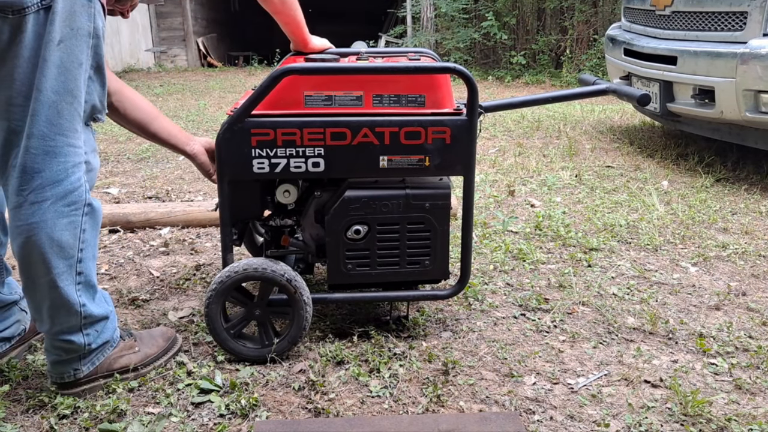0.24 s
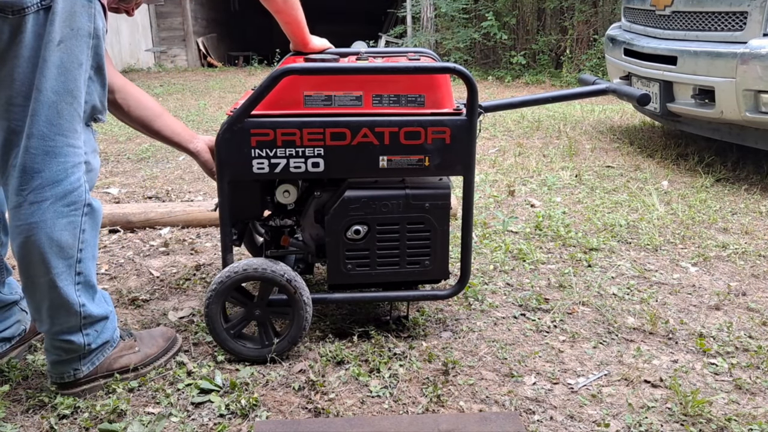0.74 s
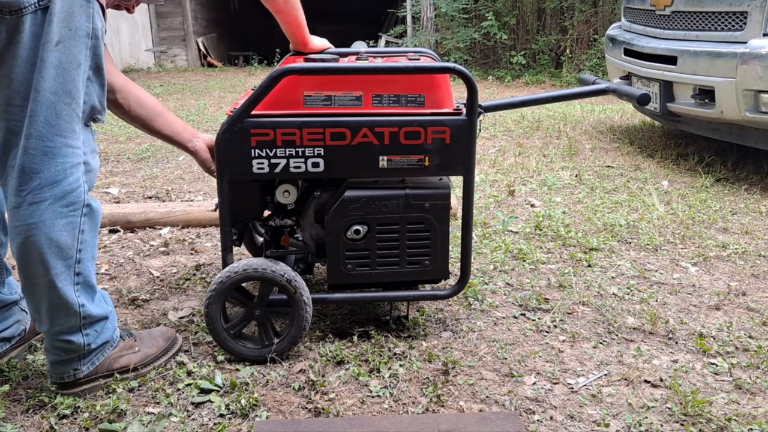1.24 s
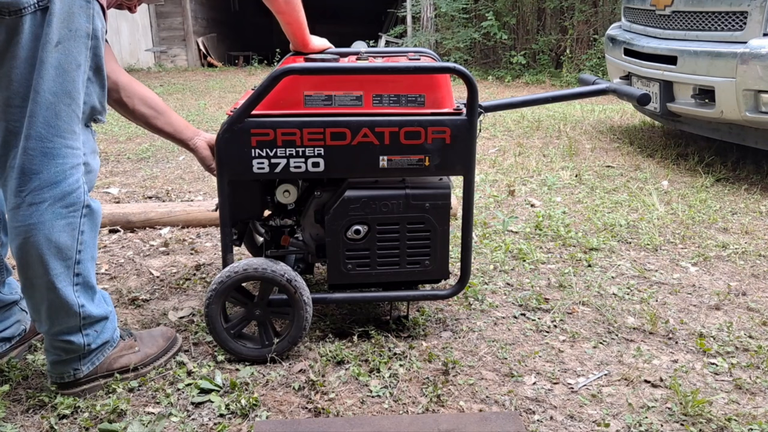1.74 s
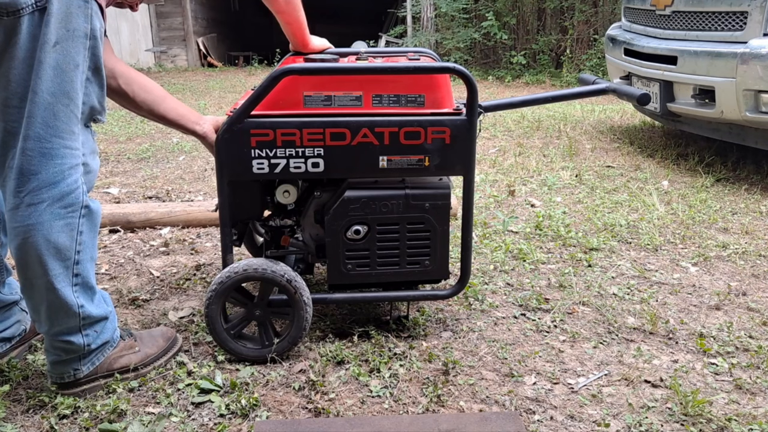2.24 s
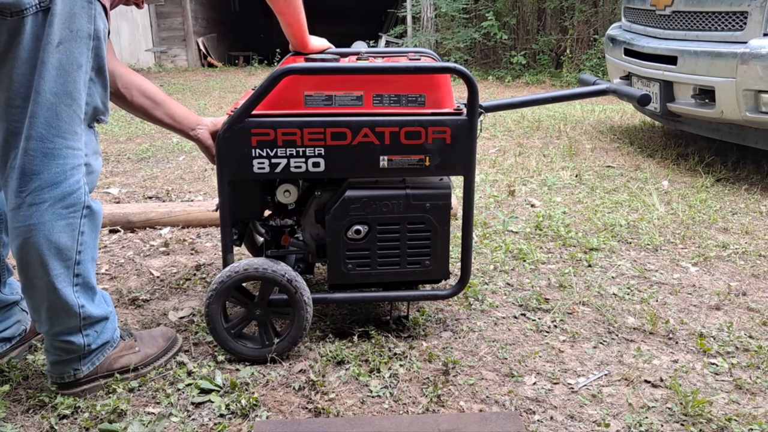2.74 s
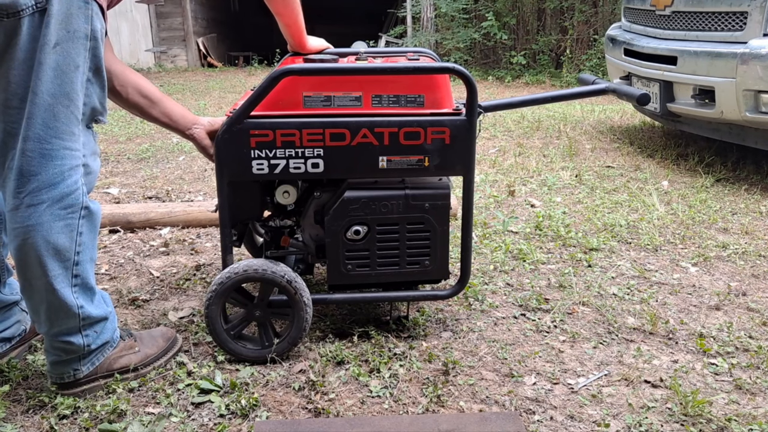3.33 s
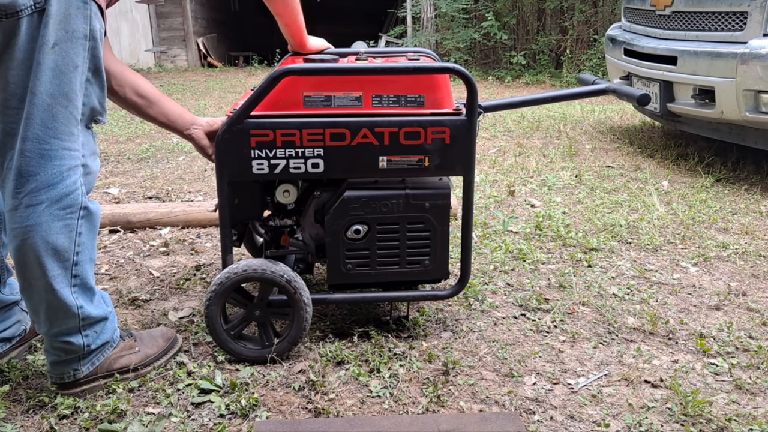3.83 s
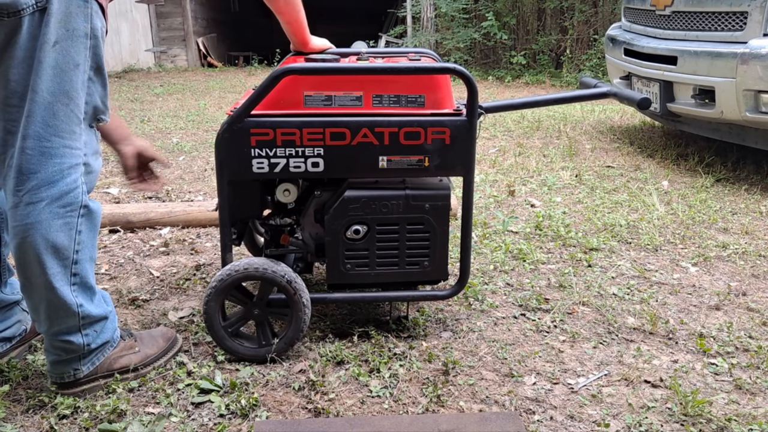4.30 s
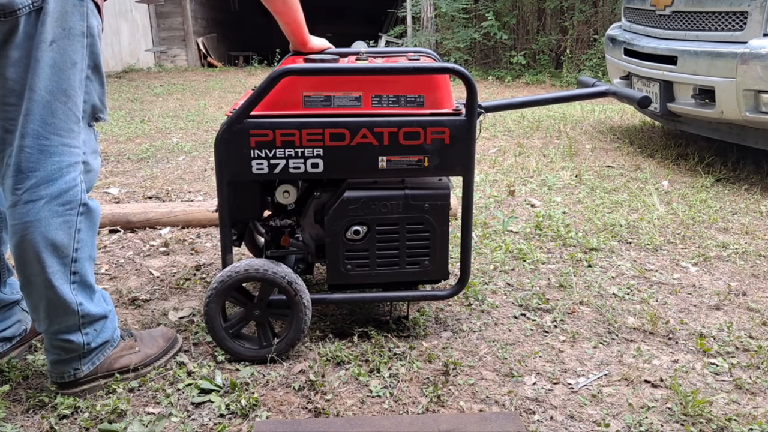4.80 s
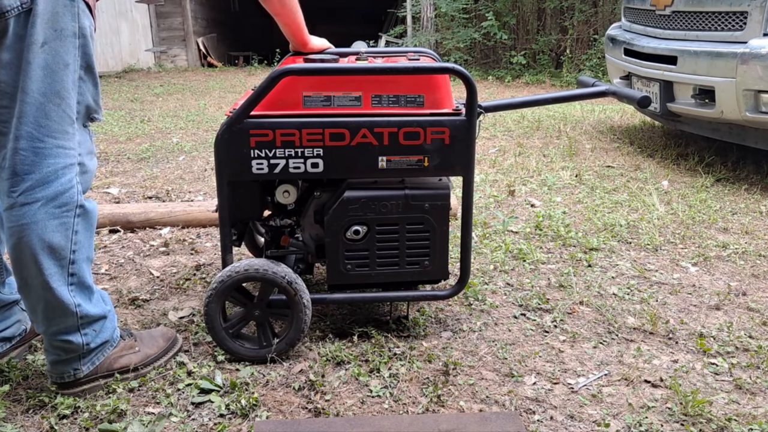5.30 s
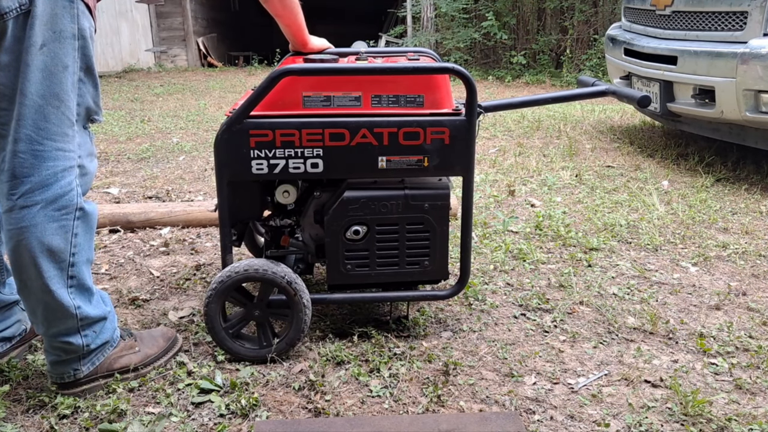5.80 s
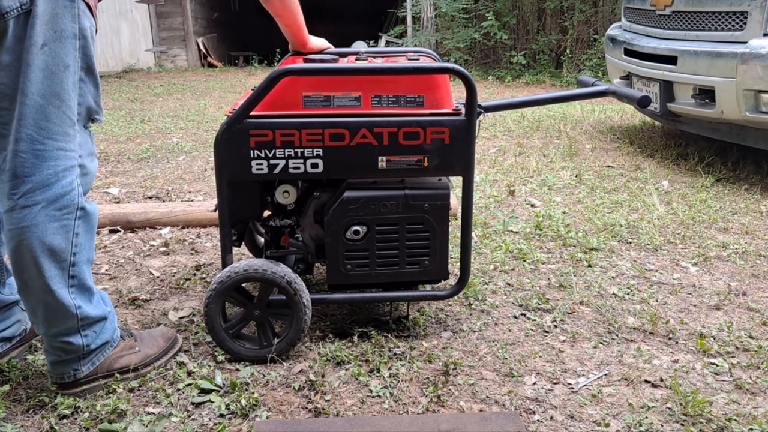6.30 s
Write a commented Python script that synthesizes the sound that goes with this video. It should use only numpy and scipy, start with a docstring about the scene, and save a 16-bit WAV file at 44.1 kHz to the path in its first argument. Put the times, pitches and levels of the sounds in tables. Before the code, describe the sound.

Quiet yard with wind and a throbbing cicada, then an electric starter grinds and a small generator engine fires up and runs unevenly.

```python
"""Wind, far hiss and a dying hum open on a yard; a hand knocks a panel, a cicada starts to throb.
The starter pinion slams in as bursts of casing noise; its gear tone climbs with rough grinding.
Dull puffs give way to the first firings of a small single-cylinder generator: pulses ring the muffler,
gas hisses, gears clatter, the frame shakes. Speed climbs past its later pace, thumps weaken and speed
sags, then louder chuffs return, the speed recovers and the thumps ease again."""
import sys
import numpy as np
from scipy import signal
from scipy.io import wavfile
from scipy.ndimage import uniform_filter1d

SR = 44100
rng = np.random.default_rng(int(sys.argv[2]) if len(sys.argv) > 2 else 0)


def to_wav(s):
    """Save 16-bit WAV."""
    ch = np.atleast_2d(s).T  # columns
    pcm = np.round(np.clip(ch, -1, 1) * 32767)  # PCM
    wavfile.write(sys.argv[1], SR, pcm.astype(np.int16))


N = 288855


def amp(db):
    """Gain of a level in dB."""
    return 10 ** (np.asarray(db) / 20)


def rms_one(x):
    """Scale to unit rms."""
    return x / np.sqrt(np.mean(x ** 2) + 1e-20)


def in_time(rows):
    """Columns of a time curve at every sample."""
    s, *columns = np.transpose(rows)
    return [np.interp(np.arange(N) / SR, s, c) for c in columns]


def between(rows):
    """Gate: 1 from the first row of a table to its last, else 0, with short ramps."""
    t = np.arange(N) / SR
    inside = 1. * (t >= rows[0][0]) * (t <= rows[-1][0])
    return uniform_filter1d(inside, size=64)


def at_hz(points, hz):
    """Read a spectrum on a log-frequency axis."""
    point_hz, value = np.transpose(points)
    return np.interp(np.log(hz), np.log(point_hz + 1e-9), value)


def drift(rate_hz):
    """Slow random curve of rms 1: two-pole filtered noise, one value per 40 samples."""
    r = np.exp(-80 * np.pi * rate_hz / SR)
    noise = rng.standard_normal(N // 40 + 2002)
    slow = signal.lfilter([1], [1, -2 * r, r * r], noise)[2000:]
    return np.interp(np.arange(N) / 40, np.arange(len(slow)), rms_one(slow))


def clicks(times_s, levels_db):
    """A train of single-sample blows."""
    out = np.full(N, 1e-18)
    at = np.round(np.asarray(times_s) * SR).astype(int)
    np.add.at(out, np.clip(at, 0, N - 1), amp(levels_db))
    return out


def fade(x, decay_s):
    """Each click becomes a sudden rise that dies away exponentially."""
    return signal.lfilter([1], [1, -np.exp(-1 / (decay_s * SR))], x)


def hold(x, lasts_s):
    """Each click becomes a smooth hump of the click's height, starting at the click."""
    return signal.fftconvolve(x, np.hanning(round(lasts_s * SR)))[:N]


def humps(times_s, heights, lasts_s):
    """Smooth humps centred on the given times."""
    out = np.zeros(N)
    out[(np.asarray(times_s) * SR).astype(int)] = heights
    return signal.fftconvolve(out, np.hanning(round(lasts_s * SR)), "same")


def ring(x, modes):
    """Each click sets every decaying mode (hz, db, t60_s) ringing."""
    out = 0
    for hz, db, t60_s in modes:
        r, w = amp(-60 / (t60_s * SR)), 2 * np.pi * hz / SR
        out = out + signal.lfilter([0, amp(db) * np.sin(w)], [1, -2 * r * np.cos(w), r * r], x)
    return out


def resonance(x, hz, width_hz):
    """Two-pole band-pass with a gain of about 1 at its peak."""
    r = np.exp(-np.pi * width_hz / SR)
    poles = [1, -2 * r * np.cos(2 * np.pi * hz / SR), r * r]
    return signal.lfilter(np.array([1, 0, -1]) * (1 - r * r) / 2, poles, x)


def bands(spectrum, like, pan, patchy_db):
    """Stereo noise in .4 octave bands, each with level, flicker, likeness and balance; mid rms 1."""
    low_hz, high_hz = spectrum[0][0], spectrum[-1][0]
    edges = np.geomspace(low_hz, high_hz, int(2.5 * np.log2(high_hz / low_hz)) + 1)
    white, out = rng.standard_normal((2, 2, N)), []
    for k, (low, high) in enumerate(zip(edges, edges[1:])):
        band_pass = signal.butter(2, [low, high], "band", fs=SR, output="sos")
        mid, side = signal.sosfilt(band_pass, white[k % 2])  # neighbours use independent noise
        hz = np.sqrt(low * high)
        alike = np.clip(at_hz(like, hz), -1, 1)
        pan_db = at_hz(pan, hz) / 2 * np.array([[1], [-1]])
        gain = amp(at_hz(spectrum, hz) + patchy_db * drift(10.4) + pan_db)
        out.append(gain * (np.sqrt(1 + alike) * mid + np.sqrt(1 - alike) * side * [[1], [-1]]))
    mid_rms = np.std(np.sum(out, axis=0).mean(axis=0))
    return np.sqrt(edges[1:] * edges[:-1]), np.array(out) / mid_rms


LEFT_BASS_CUT_HZ = 99


def right_heavy(x):
    """The left microphone port takes less bass."""
    bass_cut = signal.butter(1, LEFT_BASS_CUT_HZ, "high", fs=SR, output="sos")
    return np.array([signal.sosfilt(bass_cut, x) * amp(-2.8), x * amp(-1.1)])


# engine speed: start_s, firings_per_s
SPEED = [(4.13, 12.939), (4.2, 15.613), (4.27, 18.853), (4.35, 20.762), (4.45, 25.222), (4.55, 27.416),
         (4.7, 27.398), (4.9, 26.988), (5.1, 25.491), (5.3, 24.846), (5.5, 24.24), (5.7, 23.539),
         (5.85, 21.503), (6.0, 22.562), (6.2, 23.834), (6.4, 23.692), (6.55, 23.227)]
FIRST_FIRING_S = 4.134


def firing_times():
    """One firing each time the integral of engine speed passes a whole number."""
    cycles = np.cumsum(in_time(SPEED)[0]) / SR
    cycles = cycles - cycles[round((FIRST_FIRING_S + .003) * SR)]
    whole = np.arange(int(cycles[-1]) + 2)
    return np.interp(whole, cycles, np.arange(N) / SR, right=N / SR) - .003


def cycle(fired):
    """Running count of engine cycles."""
    return np.interp(np.arange(N) / SR, fired, np.arange(len(fired)))


# combustion, relative levels: start_s, thump_db, hiss_db
LOAD = [(4.13, -8.5, -25.5), (4.27, -5.5, -24), (4.37, -8, -30), (4.42, -7, -27), (4.53, -6.5, -30.5),
        (4.6, -13.5, -45), (4.8, -17.5, -49), (5.0, -19, -48), (5.6, -17, -45.5), (5.86, -16.5, -51),
        (5.918, -11, -28), (6.0, -11.5, -35), (6.15, -13, -40.5), (6.35, -16, -42.5), (6.55, -16, -43)]
# dull puffs while cranking, relative levels: start_s, thump_db, hiss_db
PUFFS = [(3.711, -29, -40), (3.767, -30, -55.5), (3.831, -28, -46), (3.884, -21, -60), (3.925, -27, -57),
         (3.966, -30, -49), (4.017, -20.5, -40), (4.043, -15.5, -37), (4.112, -13.5, -55)]
# side pulses of each stroke: start_s, gulp_re_thump_db, piston_push_lag_cycles
STROKES = [(4.13, -14, .3), (4.55, -10, .29), (4.65, -7, .24), (5.7, -7, .24), (5.9, -3, .24),
           (6.55, -5, .24)]
# muffler and pipe modes, relative levels: pitch_hz, level_db, t60_s
MUFFLER = [(66, -17, 0.19), (131, -5.5, 0.051), (218.3, -5.5, 0.02), (281.7, 4.5, 0.013), (345, -1, 0.0095)]
MUFFLER_TOP_HZ = 430
DULL_HZ = 184  # gulps and puffs excite little above this
GULP_LEAD_CYCLES, GULP_SPREAD_DB = .32, 1.2


def exhaust(fired):
    """Each firing sends a dip, then a push, through the muffler modes; weaker, uneven pulses surround it."""
    load_s, load_db, _ = np.transpose(LOAD)
    stroke_s, gulp_db, push_lag = np.transpose(STROKES)
    puff_s, puff_db, _ = np.transpose(PUFFS)
    count, cycle_s = len(fired), np.gradient(fired)
    db = np.interp(fired, load_s, load_db)
    gulp_db = np.interp(fired, stroke_s, gulp_db) + GULP_SPREAD_DB * rng.standard_normal(count)
    push_s = fired + np.interp(fired, stroke_s, push_lag) * cycle_s
    gulp_s = fired - GULP_LEAD_CYCLES * cycle_s
    # main pulse, piston's later push, muffler echo, intake gulp, cranking puffs
    at = np.r_[fired, push_s, fired + .014, gulp_s, puff_s]
    db = np.r_[db, db - 10, db - 16, db + gulp_db, puff_db]
    group = np.arange(len(at)) // count
    side_pulse = np.arange(len(at)) >= count
    dull = np.arange(len(at)) >= 3 * count
    sign = 1 - 2. * (group == 3)  # the gulp sucks
    at = at - .0005 + side_pulse * rng.normal(0, .0002, len(at))
    thump = 0
    for mode in MUFFLER:  # each pulse shares its energy among the modes differently
        share_db = rng.normal(0, 1, len(at)) * (.5 + .5 * side_pulse)
        share_db += dull * (6 - 10 * np.log10(1 + (mode[0] / DULL_HZ) ** 4))
        blows = 0
        for s in (1, -1):
            chosen = (at < N / SR) & (sign == s)
            blows = blows + s * clicks(at[chosen], (db + share_db)[chosen])
        push = np.roll(blows, round(.0017 * SR)) - .6 * blows
        thump = thump + ring(hold(push, 0.0018), [mode]) * amp(-31.5)
    low_pass = signal.butter(3, MUFFLER_TOP_HZ, fs=SR, output="sos")
    return right_heavy(signal.sosfilt(low_pass, thump))


# chuff spectrum, relative density: pitch_hz, level_db_per_hz
CHUFF_COLOUR = [(500, -42), (1000, -1), (2000, -1), (3000, 7), (4000, 0), (6000, 0.5), (8800, 2),
                (10500, -6), (12500, 3.5), (16500, -18)]
# hiss leads the thump more under load: hiss_db, lead_cycles
VALVE_LEAD = [(-53, 0.14), (-27.5, 0.38)]
# left-right correlation of the machine's noise: pitch_hz, likeness
NEAR_LIKE = [(60, 0.19), (150, 0.86), (380, 0.73), (950, 0.82), (2380, 0.38), (5980, 0.11), (15000, 0.018)]
# balance of the machine's noise: pitch_hz, left_re_right_db
NEAR_PAN = [(60, -16.5), (130, -6), (290, -2.5), (640, -3), (1410, -1.5), (3100, 1), (6820, -5),
            (15000, -0.5)]


def chuff(fired):
    """Gas hisses as the valve opens, a little ahead of the thump; the treble dies first."""
    load_s, _, hiss_db = np.transpose(LOAD)
    puff_s, _, puff_hiss_db = np.transpose(PUFFS)
    hiss_db = np.interp(fired, load_s, hiss_db)
    lead_s = np.interp(hiss_db, *np.transpose(VALVE_LEAD)) * np.gradient(fired)
    opens = clicks(fired - lead_s, hiss_db + rng.normal(0, 1.14, len(fired)))
    opens += clicks(puff_s - .025, puff_hiss_db)
    opens = hold(opens, 0.011) * amp(-33.5)  # the valve takes some ms to open
    hz, noise = bands(CHUFF_COLOUR, NEAR_LIKE, NEAR_PAN, patchy_db=1.5)
    return sum(band * fade(opens, 0.024 * (f / 4000) ** -.15) for f, band in zip(hz, noise))


CRANK_HUM_RE_THUMP_DB, CRANK_HUM_LEAD_CYCLES = -28, .08


def crank_hum(fired):
    """The crank turns twice per firing and hums at that rate, following load."""
    tone = np.cos(4 * np.pi * (cycle(fired) + CRANK_HUM_LEAD_CYCLES))
    level_db = in_time(LOAD)[0] + CRANK_HUM_RE_THUMP_DB + 1.1 * drift(4)
    return right_heavy(tone * amp(level_db) * between(SPEED))


FIRST_SQUEEZE_S, SQUEEZE_GAP_S = 2.99, .217
SQUEEZE_DB, SQUEEZE_LASTS_S = 2, 0.066


def squeezes():
    """Moments of compression while the starter turns the engine."""
    return FIRST_SQUEEZE_S + SQUEEZE_GAP_S * np.arange(5)


def squeeze_swell_db():
    """The starter labours against each compression: a short swell."""
    return humps(squeezes(), SQUEEZE_DB, SQUEEZE_LASTS_S)


# gears, valves and fan, relative levels: start_s, clatter_db, treble_re_clatter_db
CRANKING = [(2.648, -36, 25), (2.654, -15, 10.5), (2.702, -18.5, 2), (2.762, -22.5, 2), (2.88, -20.5, 3.5),
            (2.98, -23.5, 8.5), (3.67, -24, 6.5), (3.71, -23.5, 5.5), (3.948, -26, 3.5),
            (3.992, -19.5, 3.5), (4.08, -22, 1.5)]
RUNNING = [(4.12, -21.5, 7), (4.32, -20, 3.5), (5.54, -23, -2), (5.91, -22.5, 0.5), (6.1, -19.5, 1.5),
           (6.55, -20.5, -2.5)]
# clatter spectrum, relative density: pitch_hz, level_db_per_hz
CLATTER_COLOUR = [(100, -1), (140, 7), (204, 2), (354, 5), (440, -6.5), (542, -0.5), (1180, 0.5),
                  (2150, -0.5), (2840, -4), (4500, -9.5), (6170, -24), (8800, -9), (10500, -34),
                  (12500, -25), (16500, -21)]
# frame and cover resonances: pitch_hz, width_hz, gain_db
CASING = [(528.6, 30, 9.5), (806, 54, 6.5), (1103, 2.2, 12), (1340, 80, -5.5), (1560, 8.3, 6),
          (2860, 20, 8.5), (3710, 6.7, 8.5), (5590, 120, 7.5), (7060, 116, 3.5)]
# pinion meets ring gear, relative levels: start_s, peak_db
SLAMS = [(2.646, -23), (2.651, -13), (2.669, -7.5), (2.681, -24), (2.695, -9), (2.712, -8.5),
         (2.723, -10.5)]
CRANKING_BASS_DB, RUNNING_BASS_DB = -14, -10  # bass re clatter
STROKE_SWING_DB, STROKE_LAG_CYCLES = 0.5, 0.02


def clatter(fired):
    """Dense contacts and pinion slams as casing-coloured noise; compressions and firings swell the contacts."""
    level_db, treble_db = in_time(CRANKING + RUNNING)
    running = between(RUNNING)
    bass_db = CRANKING_BASS_DB + (RUNNING_BASS_DB - CRANKING_BASS_DB) * running
    stroke = np.cos(2 * np.pi * (cycle(fired) - STROKE_LAG_CYCLES))
    level_db = level_db + squeeze_swell_db() + running * STROKE_SWING_DB * stroke
    hz, noise = bands(CLATTER_COLOUR, NEAR_LIKE, NEAR_PAN, patchy_db=1.0)
    contacts = 0
    for f, band in zip(hz, noise):
        tilt_db = treble_db * np.clip(np.log2(f / 3000), 0, 1) + bass_db * (f < 430)
        contacts = contacts + band * amp(tilt_db)
    casing = sum((amp(db) - 1) * resonance(contacts, f, width) for f, width, db in CASING)
    steady = amp(level_db + 0.86 * drift(52)) * between(CRANKING + RUNNING)
    slam = fade(clicks(*np.transpose(SLAMS)), 0.0023) * amp(-10)
    return (contacts + casing) * (steady + slam)


# engine block modes, relative levels: pitch_hz, level_db, t60_s
BLOCK = [(174, -28, 0.4), (268, -23, 0.33), (312, -23, 0.53)]


def block():
    """The pinion's blows set the engine block ringing."""
    return ring(clicks(*np.transpose(SLAMS)), BLOCK)


# starter gear mesh, relative levels: start_s, pitch_hz, level_db
WHINE = [(2.75, 1250, -36), (2.8, 1400, -28), (2.9, 1740, -25), (2.95, 1850, -27), (3.05, 1980, -31),
         (3.2, 2090, -29), (3.4, 2130, -29), (3.66, 2190, -28), (3.74, 2190, -38)]


def whine():
    """The tooth mesh sings a rough tone that climbs with starter speed; a fainter one lies above."""
    hz, db = in_time(WHINE)
    out = 0
    for ratio, below_db in ((1, 0), (1.48, -9)):
        phase = 2 * np.pi * np.cumsum(ratio * hz * (1 + .021 * drift(60))) / SR
        tone = np.sin(phase + np.array([[0], [.6]]))  # right channel leads by .6 rad
        out = out + tone * (1 + .6 * drift(90)) * amp(below_db)
    return out * amp(db) * between(WHINE)


# starter housing, relative levels: pitch_hz, width_hz, level_db
STARTER = [(2015, 24, 0.5), (2245, 30, 3), (2580, 30, -6), (2750, 66, 3.5), (2887, 25, 0), (3096, 47, 1),
           (3320, 54, -2), (3610, 40, -4.5), (3950, 30, -3)]
GRIND_RE_WHINE_DB, GRIND_PER_OCTAVE_DB = 5, 10


def grind():
    """Rough tooth contact rings the starter housing while the mesh sings, growing with starter speed."""
    hz, db = in_time(WHINE)
    noise = rng.standard_normal((2, N)) + 0.38 * rng.standard_normal(N)
    rung = sum(amp(g) * resonance(noise, f, width) / np.sqrt(width) for f, width, g in STARTER)
    speed_db = GRIND_PER_OCTAVE_DB * np.log2(hz / WHINE[-1][1])
    swell_db = squeeze_swell_db() + 1.4 * drift(30) + speed_db
    return rms_one(rung) * amp(db + GRIND_RE_WHINE_DB + swell_db) * between(WHINE)


# low shaking of the frame, relative levels: start_s, level_db
SHAKE = [(2.65, -51), (3.6, -39), (3.9, -27.5), (4.13, -19), (4.52, -17), (4.72, -27), (5.6, -31),
         (5.75, -23), (5.95, -16), (6.05, -29), (6.55, -45)]
# shake spectrum, relative density: pitch_hz, level_db_per_hz
SHAKE_COLOUR = [(25, -29), (40, -23), (60, 1), (85, -1.5), (115, -2.5), (150, -8.5)]
# single jolts of the frame, relative levels: centre_s, height_db
JOLTS = [(2.67, -38), (4.02, -26), (4.79, -25), (4.97, -24), (5.29, -31), (5.69, -23)]
JOLT_LASTS_S = .07
LURCH_AFTER_S, LURCH_DB, LURCH_GROWS_DB = .07, -35, 1  # relative level, growth per lurch


def shake():
    """The machine rocks: low noise rumbles, lurches as the piston goes over, and jolts."""
    rumble = bands(SHAKE_COLOUR, NEAR_LIKE, NEAR_PAN, patchy_db=1.5)[1].sum(axis=(0, 1))
    jolt_s, jolt_db = np.transpose(JOLTS)
    jolts = humps(jolt_s, amp(jolt_db), JOLT_LASTS_S)
    lurch_db = LURCH_DB + LURCH_GROWS_DB * np.arange(5)
    lurches = humps(squeezes() + LURCH_AFTER_S, amp(lurch_db), JOLT_LASTS_S)
    steady = amp(in_time(SHAKE)[0]) * between(SHAKE)
    return right_heavy(rumble * (steady + jolts + lurches) * amp(-10.0))


# hand on the panel, relative levels: start_s, peak_db, tick_re_peak_db
KNOCKS = [(0.119, -66, -30), (1.664, -56, -2), (2.225, -54, -30), (2.25, -56, -30), (2.406, -40, -30),
          (2.427, -56, -30), (2.447, -51, -30)]
# panel modes, relative levels: pitch_hz, level_db, t60_s
PANEL = [(680, -5, .016), (880, -4, .016), (1380, -9, .014), (2450, -10, .01), (3400, -6, .014)]


def knocks():
    """A hand rubs and taps the panel modes, with bright noise ticks."""
    s, db, tick_db = np.transpose(KNOCKS)
    rub = fade(clicks(s, db), 0.011) * rng.standard_normal(N)
    tap = 4.0 * clicks(s + 0.00203, db)
    ticks = fade(clicks(s, db + tick_db), 0.0075) * rng.standard_normal(N)
    return (ring(rub + tap, PANEL) * amp(-16.5) + ticks) * amp([[-2], [2]])


# cicada throbs, relative levels: start_s, peak_db
CICADA = [(0.84, -51), (1.3, -43.5), (2.0, -39.5), (2.6, -39), (4.0, -54)]
CICADA_LOW_HZ, CICADA_HIGH_HZ, CICADA_CLICKS_HZ = 6700, 8500, 368
TYMBAL_HZ, TYMBAL_WIDTH_HZ, THROB_SPREAD_DB = 7500, 900, .6
FIRST_THROB_S, FIRST_GAP_S, LAST_GAP_S, SLOWING_THROBS = .836, .0369, .0516, 31.3


def cicada():
    """Tymbal clicks pulse a bright noise band, in slowing throbs over a steadier buzz."""
    left_to_slow = np.maximum(1 - (np.arange(64) - .5) / SLOWING_THROBS, 0)
    gaps = LAST_GAP_S - (LAST_GAP_S - FIRST_GAP_S) * left_to_slow ** 2
    s = FIRST_THROB_S + np.cumsum(gaps) - gaps[0]
    db = np.interp(s, *np.transpose(CICADA)) + THROB_SPREAD_DB * rng.standard_normal(len(s))
    throbs = clicks(s, db)
    tick = np.maximum(np.sin(2 * np.pi * CICADA_CLICKS_HZ * np.arange(N) / SR), 0) ** 2 + 0.73
    band = signal.butter(3, [CICADA_LOW_HZ, CICADA_HIGH_HZ], "band", fs=SR, output="sos")
    buzz = rms_one(signal.sosfilt(band, rng.standard_normal((2, N)) * tick))
    throb = rms_one(resonance(buzz, TYMBAL_HZ, TYMBAL_WIDTH_HZ)) * hold(throbs, 0.031)
    return (throb + 0.26 * buzz * hold(throbs, 0.12)) * amp(-9.5) * amp([[-1], [4]])


# low hum dying away, relative levels: start_s, pitch_hz, level_db
HUM = [(0.0, 82.5, -33), (0.15, 75.5, -43), (0.282, 77, -37), (0.338, 66.1, -53), (0.5, 61, -63)]


def hum():
    """A gliding low sine, stronger on the right."""
    hz, db = in_time(HUM)
    tone = np.sin(2 * np.pi * np.cumsum(hz) / SR)
    return tone * amp(db + 2) * between(HUM) * amp([[-4], [3]])


# yard, relative levels: start_s, wind_db, hiss_db
YARD = [(0.0, -43.5, -52), (0.3, -47, -56.5), (0.5, -47.5, -57.5), (1.3, -50, -58), (1.6, -44.5, -57),
        (1.66, -44.5, -55.5), (1.9, -49.5, -54.5), (2.03, -44.5, -54), (2.1, -46.5, -54),
        (2.47, -44, -52.5), (2.56, -46.5, -54.5)]
# wind spectrum, relative density: pitch_hz, level_db_per_hz
WIND_COLOUR = [(15, -53), (25, -30), (42, -12), (75, 0), (129, -8), (146, -19), (216, -10), (500, -52),
               (650, -73), (1100, -120)]
# left-right correlation of the yard's noise: pitch_hz, likeness
FAR_LIKE = [(60, 1), (180, 0.64), (550, 0.42), (1650, -0.27), (4970, 0.059), (15000, -0.14)]
# balance of the yard's noise: pitch_hz, left_re_right_db
FAR_PAN = [(60, -22), (130, -11), (290, -7), (640, -8), (1410, -10), (3100, -2.5), (6820, -3.5),
           (15000, -3)]
GUST_DB, GUST_RATE_HZ = 1, 5.7


def wind():
    """Lumpy low noise of wind on the microphone ports."""
    noise = bands(WIND_COLOUR, FAR_LIKE, FAR_PAN, patchy_db=3.5)[1].sum(axis=0)
    return noise * amp(in_time(YARD)[0] + GUST_DB * drift(GUST_RATE_HZ))


# far hiss spectrum, relative density: pitch_hz, level_db_per_hz
HISS_COLOUR = [(250, -30), (600, -1), (885, -5.5), (1120, -11.5), (2210, -10.5), (2650, -4.5), (3290, -1),
               (5340, 1.5), (6620, 0.5), (8600, 6), (9800, -18), (11500, -25), (14000, -13), (16500, -18)]


def leaf_hiss():
    """Far leaves as flickering broadband noise."""
    noise = bands(HISS_COLOUR, FAR_LIKE, FAR_PAN, patchy_db=1.75)[1].sum(axis=0)
    return noise * amp(in_time(YARD)[1] + 1)


GROUND_DIP_HZ, GROUND_DIP_WIDTH_HZ, GROUND_DIP_SHARE = 445, 80, .75


def scene():
    """Ground reflection partly cancels one band of the machine; the panel knocks and yard are added."""
    fired = firing_times()
    machine = exhaust(fired) + chuff(fired) + crank_hum(fired) + clatter(fired) + block()
    machine = machine + whine() + grind() + shake()
    machine = machine - GROUND_DIP_SHARE * resonance(machine, GROUND_DIP_HZ, GROUND_DIP_WIDTH_HZ)
    return machine + knocks() + cicada() + hum() + wind() + leaf_hiss()


MIC_DIP_HZ, MIC_DIP_WIDTH_HZ, MIC_DIP_SHARE = 9910, 6400, 0.71
CUTOFF_HZ = 16350


def record(dry):
    """The microphone housing dips the upper treble, peaks are rounded, the top is cut."""
    heard = dry - MIC_DIP_SHARE * resonance(dry, MIC_DIP_HZ, MIC_DIP_WIDTH_HZ)
    rounded = 1.429 * np.tanh(heard / 1.56)
    return signal.sosfilt(signal.cheby2(14, 70, CUTOFF_HZ, fs=SR, output="sos"), rounded)


dry = scene()
out = record(dry)
to_wav(out)
```